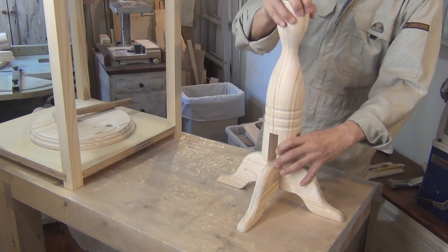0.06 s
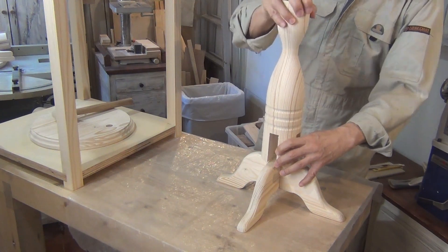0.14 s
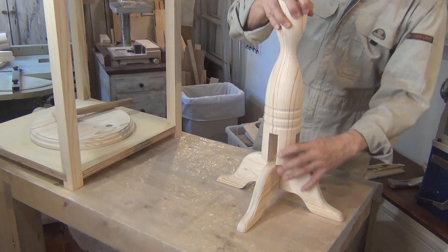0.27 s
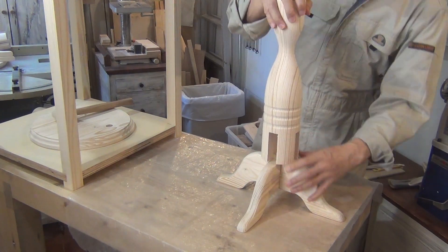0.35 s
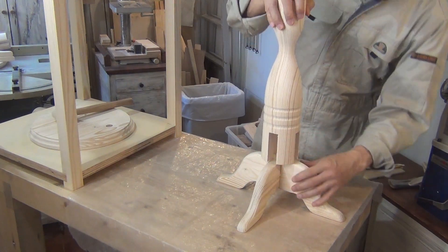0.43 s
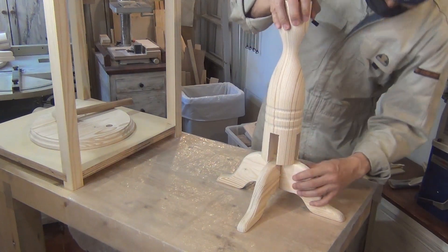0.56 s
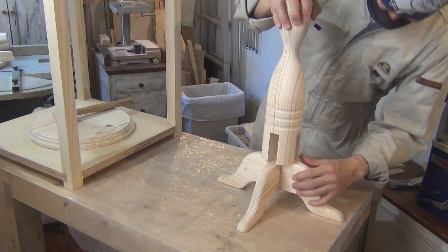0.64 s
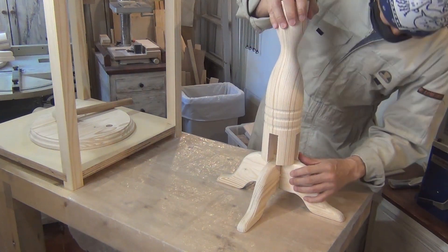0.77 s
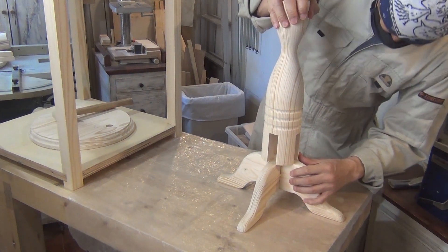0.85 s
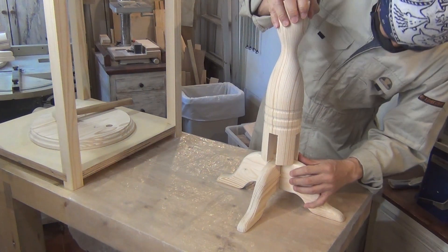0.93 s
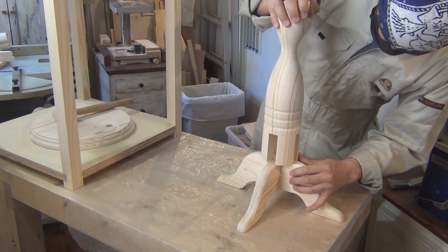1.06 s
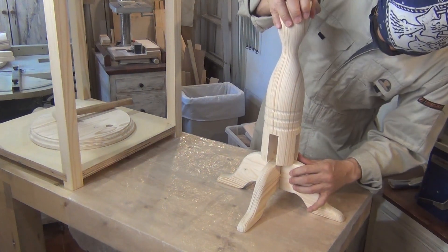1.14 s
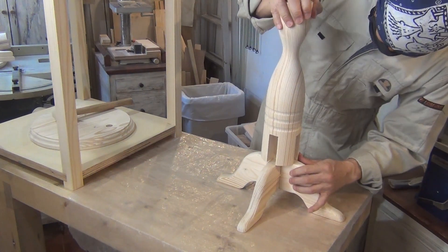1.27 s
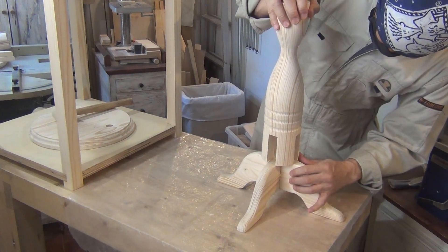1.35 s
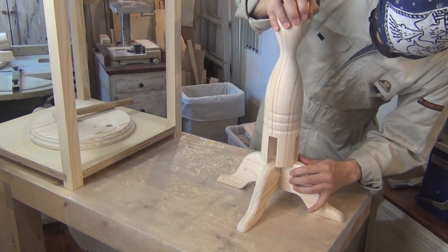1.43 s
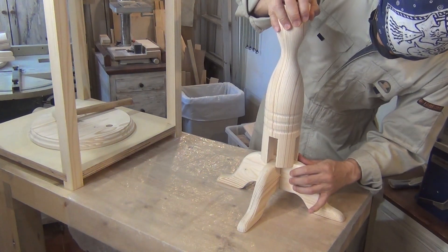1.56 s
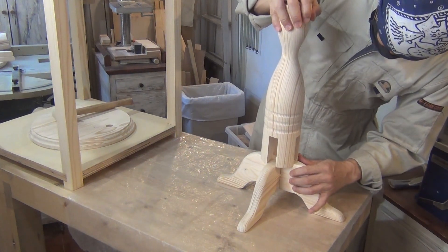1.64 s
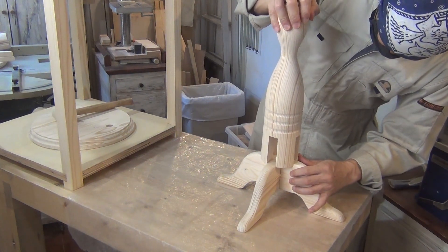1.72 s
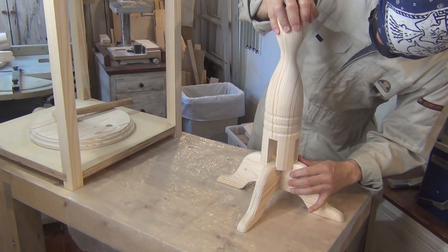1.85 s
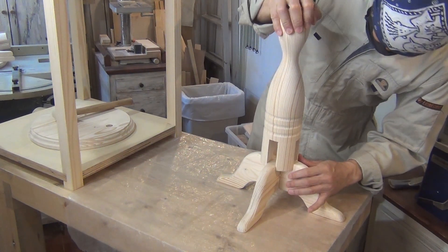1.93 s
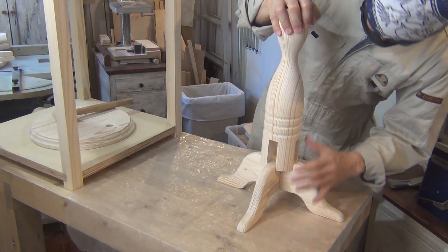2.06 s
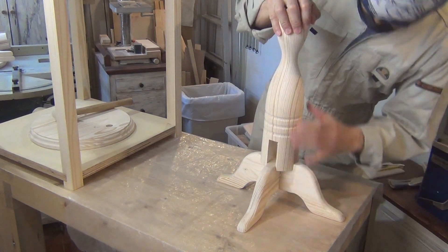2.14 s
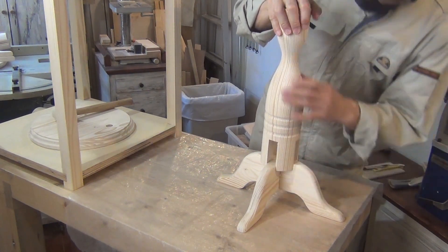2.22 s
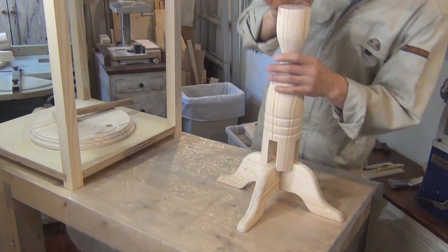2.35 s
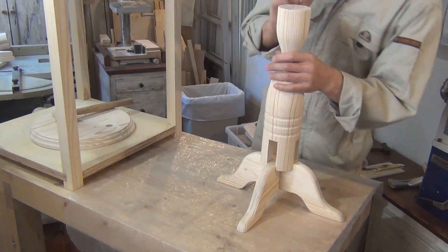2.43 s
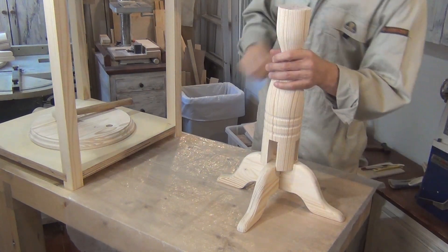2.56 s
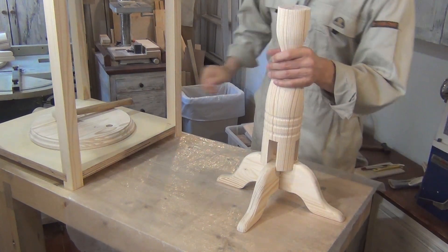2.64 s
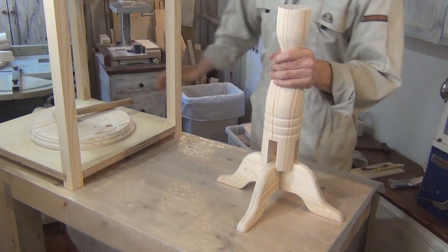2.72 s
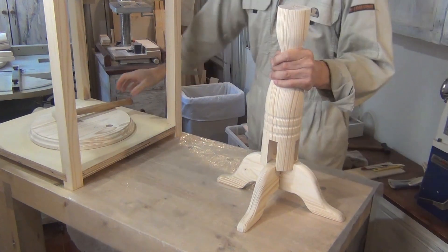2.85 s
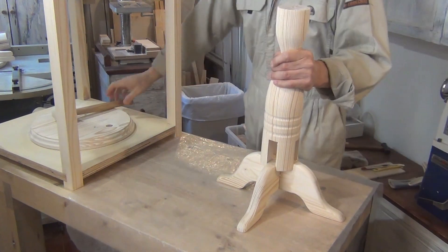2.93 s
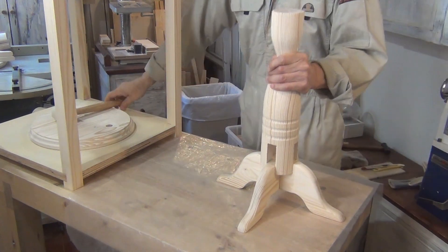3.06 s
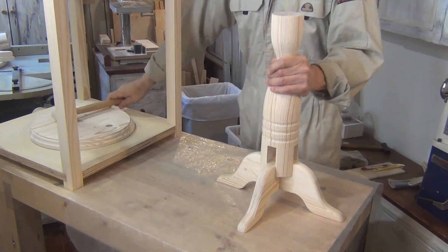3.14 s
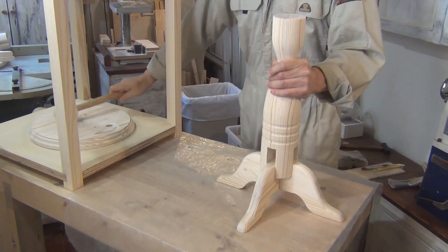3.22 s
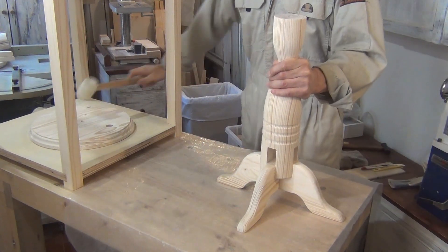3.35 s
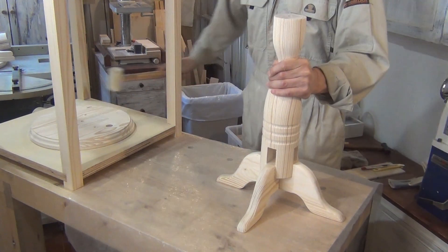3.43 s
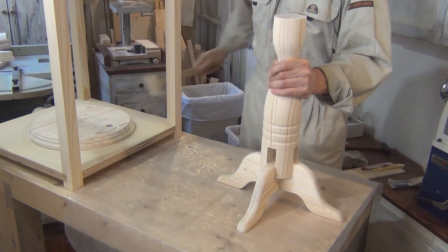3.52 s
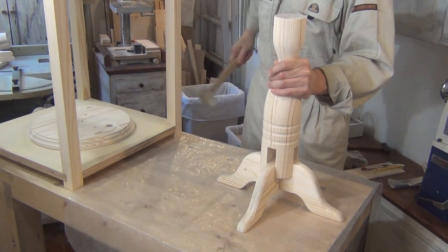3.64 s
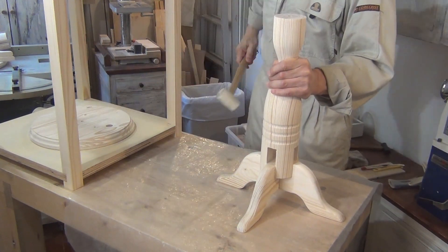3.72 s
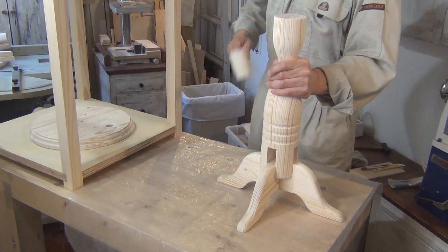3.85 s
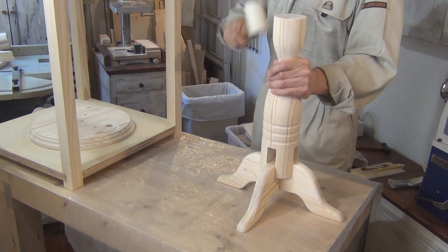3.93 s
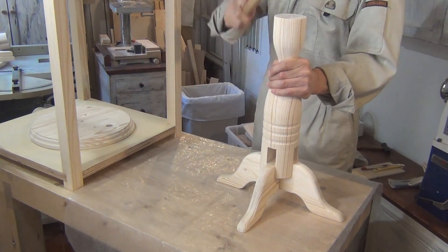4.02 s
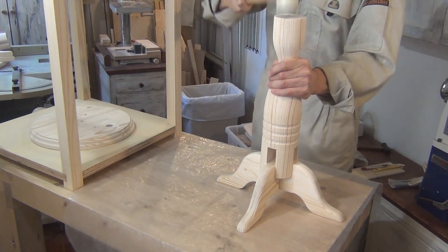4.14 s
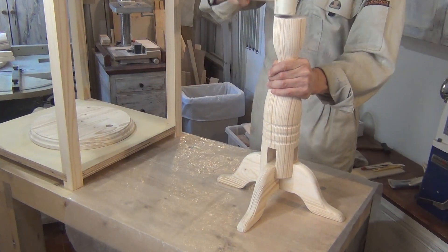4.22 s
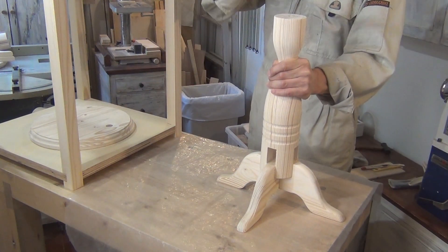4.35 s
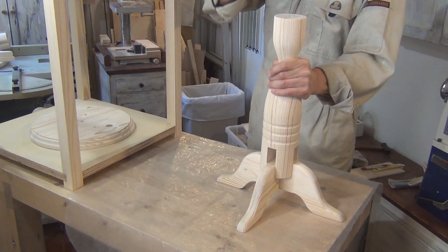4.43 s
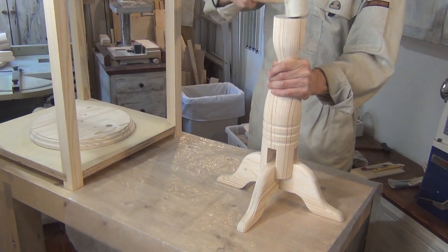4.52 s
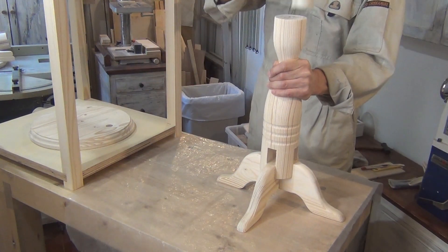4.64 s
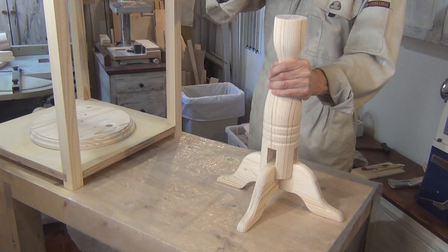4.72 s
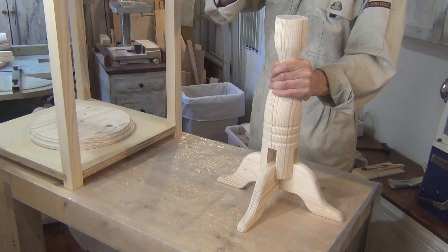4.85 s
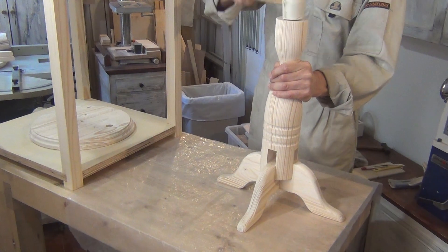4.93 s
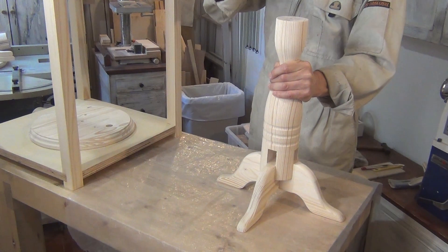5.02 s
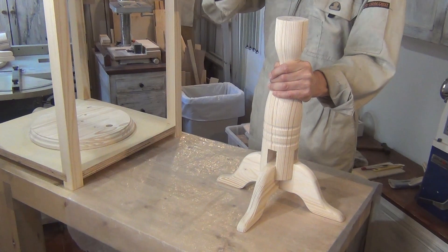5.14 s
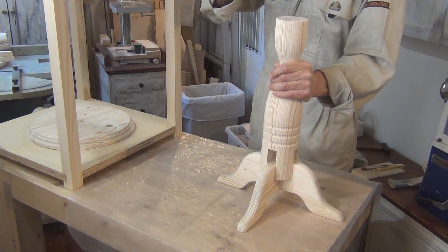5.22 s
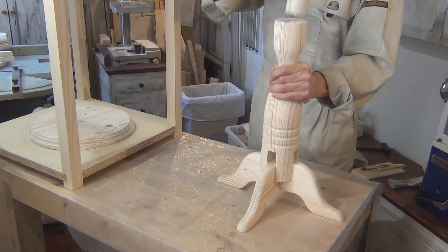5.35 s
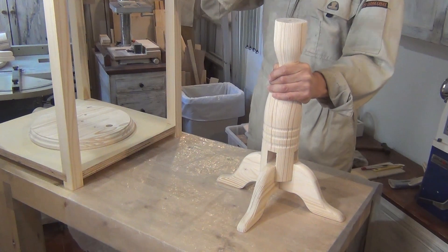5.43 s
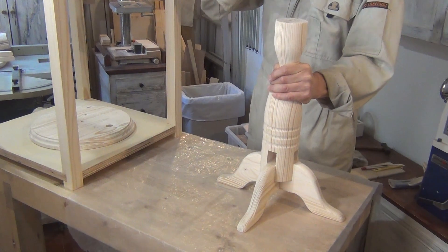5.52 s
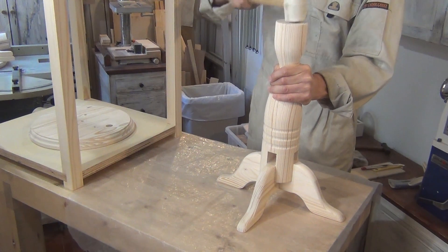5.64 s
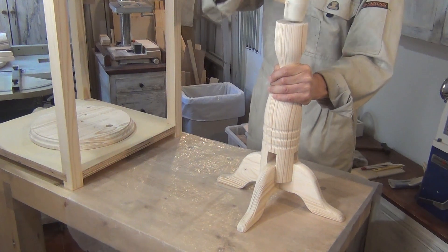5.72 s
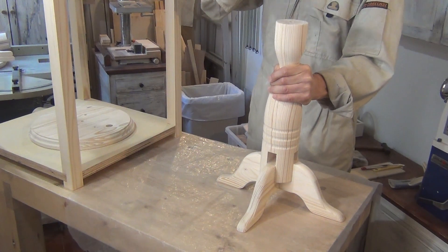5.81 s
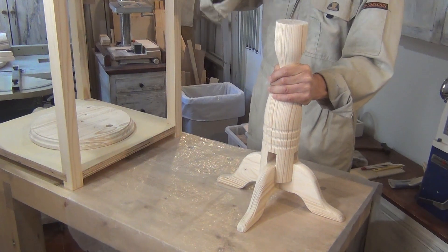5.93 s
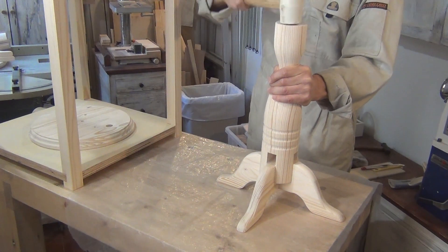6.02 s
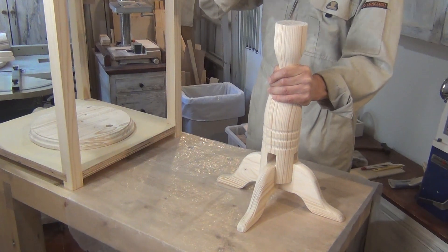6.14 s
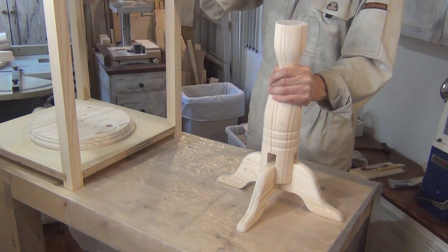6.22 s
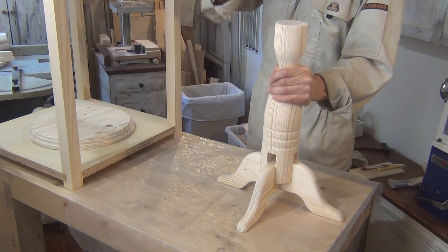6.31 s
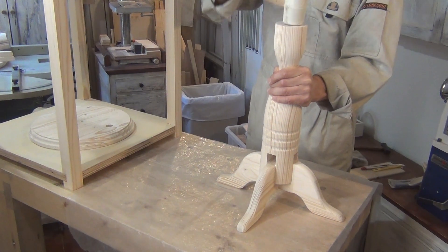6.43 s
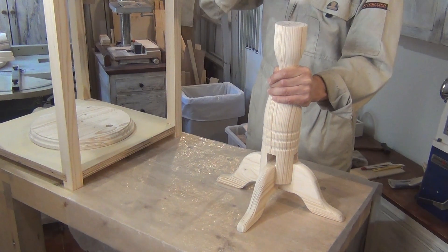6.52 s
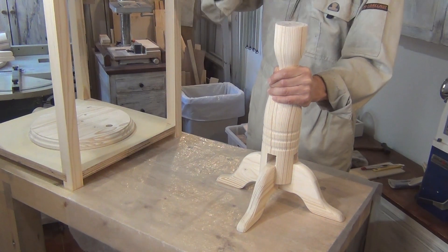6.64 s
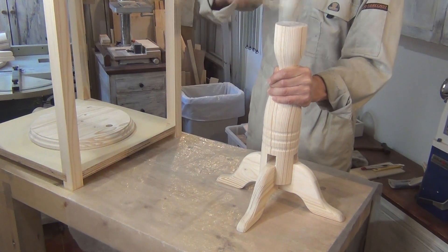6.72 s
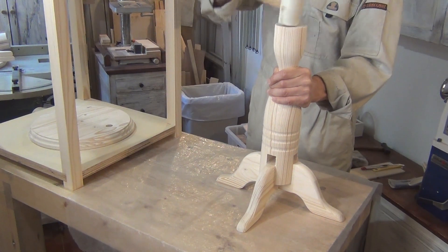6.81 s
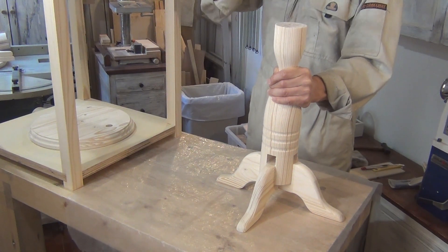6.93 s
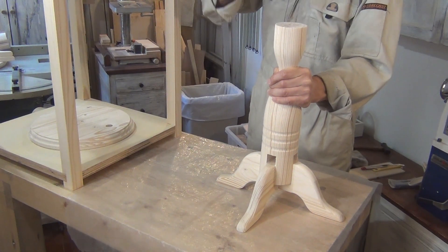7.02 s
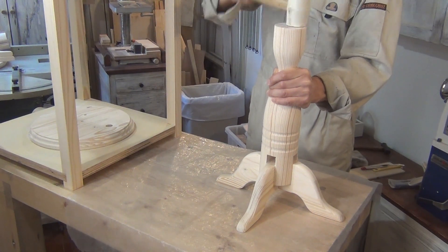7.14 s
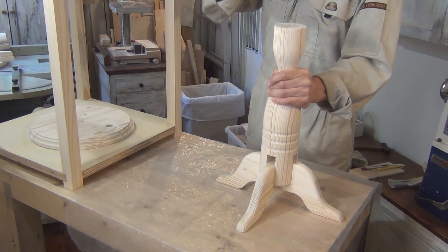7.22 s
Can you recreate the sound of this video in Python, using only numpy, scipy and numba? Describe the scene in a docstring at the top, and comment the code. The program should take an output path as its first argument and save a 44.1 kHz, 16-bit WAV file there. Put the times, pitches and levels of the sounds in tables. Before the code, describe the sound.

Hands rub softly over bare wood, a leg clunks and wood judders on a bench, then nine hard, evenly spaced mallet knocks ring through a small workshop.

```python
"""A small workshop. Room air, filtered noise with steady hums, lies under hands rubbing a wooden column: trains
of tiny slips. A leg clunks softly at 1.4 and 2.77 s, noise bursts with damped modes; near 2.4 and 3.3 s wood
drags in resonant judders. A low sine near 80 Hz rings on after the second clunk, then swells again. From 4.2 s
a mallet gives nine nearly regular blows: crack, diffuse room, bench modes and a rattling tray. After some, a
steel tool rings in beating sines and loose metal things ping. A fast and a slow level control act on the whole."""
import sys
import numpy as np
from scipy import signal
from scipy.fft import rfft, irfft, next_fast_len
from scipy.io import wavfile
from scipy.ndimage import uniform_filter1d, map_coordinates
from numba import njit

SR = 44100
rng = np.random.default_rng(int(sys.argv[2]) if len(sys.argv) > 2 else 0)


def linear_from_db(decibels):
    """Turn decibels (scalar or array-like) into linear amplitude factors; 0 gives 1."""
    return 10 ** (np.asarray(decibels, float) / 20)


def waveform_to_disk(signal):
    """Save audio, clipped to [-1, 1], as 16-bit WAV at the path in sys.argv[1]."""
    frames = np.transpose(np.atleast_2d(signal))
    scaled = np.clip(frames, -1, 1) * 32767
    samples = np.round(scaled).astype(np.int16)
    wavfile.write(sys.argv[1], SR, samples)


N = 320607


def unit(x):
    """Normalization of power: scale to rms 1."""
    return x / np.sqrt(np.mean(x ** 2) + 1e-20)


def along(points, hz):
    """Interpolation of (f/Hz, value) points on a logarithmic frequency axis."""
    f, v = np.transpose(points)
    return np.interp(np.log(hz + 1), np.log(f + 1), v)


def wobble(rate):
    """Band-limited random modulation: a smooth curve through `rate` random knots a second."""
    knots = rng.standard_normal(int(N * rate / SR) + 4)
    return map_coordinates(knots, [np.arange(N) * rate / SR])


def envelope(rows):
    """Incoherent addition: rows rise, hold and fall exponentially, and overlapping rows add in power."""
    start, rise, hold, db, fall = np.transpose(rows)[..., None]
    t = np.arange(N) / SR - start
    onset = np.clip(t / np.abs(rise), 0, 1) ** 1.36
    shape = onset * linear_from_db(db - fall * np.maximum(t - rise - hold, 0))
    return np.sqrt(np.sum(shape ** 2, axis=0))


def filtered(x, response):
    """Linear filtering: multiply the spectrum by a complex response of frequency."""
    m = 2 * next_fast_len(x.shape[-1] // 2 + 4096)
    spectrum = rfft(x, m) * response(np.fft.rfftfreq(m, 1 / SR))
    return irfft(spectrum, m)[..., :x.shape[-1]]


def resonant(x, peaks):
    """Modal superposition: causal second-order resonances summed with alternating sign."""
    def response(f):
        return sum((-1) ** k * linear_from_db(db) * 1j * f * width / (centre * centre - f * f + 1j * f * width)
                   for k, (centre, width, db) in enumerate(peaks))
    return filtered(x, response)


def causal(x, colour):
    """Minimum phase: a dB curve of frequency is folded in the cepstrum, so nothing sounds before a hit."""
    def response(hz):
        cepstrum = irfft(np.log(linear_from_db(colour(hz)) + 1e-6))
        half = len(cepstrum) // 2
        cepstrum = cepstrum * np.r_[1, np.full(half - 1, 2), 1, np.zeros(half - 1)]
        return np.exp(rfft(cepstrum))[:len(hz)]
    return filtered(x, response)


# stereo width of the field: f/Hz, filter gain from twin to side/dB
SIDE_GAIN = [(35, 1), (60, -6), (110, -12), (200, -15), (380, -16.5), (700, -18.5), (1290, -19.5),
             (2380, -23), (4400, -19), (8120, -8.5), (15000, -41)]


def stereo(mid, twin):
    """Interchannel decorrelation: a second signal, weakened by frequency, becomes the side signal."""
    side = causal(twin, lambda hz: along(SIDE_GAIN, hz))
    return np.array([mid + side, mid - side])


# reverberation of the room: f/Hz, t60/s
ROOM_T60 = [(80, 0.38), (250, 0.26), (1000, 0.3), (4000, 0.28), (8000, 0.27), (14000, 0.16)]


def tail(colour):
    """Diffuse reverberation: two noises in which each frequency decays at its own speed."""
    hz, t, z = signal.stft(rng.standard_normal((2, SR)), SR, nperseg=256)
    level_db = colour(hz)[:, None] - 60 * t / along(ROOM_T60, hz)[:, None]
    return signal.istft(z * linear_from_db(level_db), SR, nperseg=256)[1][:, :SR]


def ring(modes, scatter_db, attack):
    """Modal decay: damped sines of (f/Hz, level/dB, t60/s), randomly scattered in level at each call."""
    t = np.arange(SR) / SR
    hz, db, t60 = np.transpose(modes)[..., None]
    size = linear_from_db(db + scatter_db * rng.standard_normal(hz.shape) - 60 * t / t60)
    return np.sum(size * np.sin(2 * np.pi * hz * t), axis=0) * (1 - np.exp(-t / attack))


def grit(density, spread_db):
    """Stick-slip friction as shot noise: two random trains of `density` uneven slips a second."""
    slips = (rng.random((2, N)) < density / SR) * rng.standard_normal((2, N))
    return unit(slips * linear_from_db(spread_db * wobble(60)))


# spectrum of room air and hiss: f/Hz, relative level per Hz/dB
AIR_SPECTRUM = [(13, -62), (22, -32.5), (44, 3), (103, -5.5), (156, -1.5), (212, -7.5), (321, -2),
                (447, -4.5), (513, -5), (820, -6.5), (916, -5.5), (2160, -17.5), (2690, -19),
                (13700, -27.5), (16200, -27.5)]
# faint steady tones: f/Hz, level/dB, waver/dB
HUM_TONES = [(35, -54, 2.5), (1560, -71, 2.5), (15734, -66, 1.5)]
# low tone near 80 Hz, first ringing on after the clunk at 2.77 s, then swelling again:
# start t/s, rise t/s, hold t/s, level/dB, fall/(dB per s)
LOW_TONE_ROWS = [(2.75, 0.024, .01, -50, 55), (3.1, 0.74, .2, -54, 17), (4.2, 0.22, .02, -49, 70)]
AIR_DB = -53.5
LOW_TONE_HZ, LOW_TONE_SAG_HZ_PER_S = 81, 3.4  # pitch at the start of the first row; steady sinking


def background():
    """Stationary noise and tones: room air with slow patches, wavering hums and a sinking low tone."""
    z = signal.stft(rng.standard_normal((2, N)), nperseg=512)[2]
    patches = uniform_filter1d(rng.standard_normal(z.shape[1:]), size=6, axis=0)  # over frequency
    patches = unit(uniform_filter1d(patches, size=12, axis=1))  # over time
    noise = signal.istft(z * linear_from_db(1.2 * patches), nperseg=512)[1][:, :N]
    air = linear_from_db(AIR_DB) * unit(filtered(noise, lambda hz: linear_from_db(along(AIR_SPECTRUM, hz))))
    t = np.arange(N) / SR
    hums = sum(linear_from_db(db + waver_db * wobble(9)) * np.sin(2 * np.pi * hz * t) for hz, db, waver_db in HUM_TONES)
    low_hz = LOW_TONE_HZ - LOW_TONE_SAG_HZ_PER_S * (t - LOW_TONE_ROWS[0][0])
    low_tone = np.sin(2 * np.pi * np.cumsum(low_hz) / SR)
    low_tone = envelope(LOW_TONE_ROWS) * linear_from_db(1.1 * wobble(4.1)) * low_tone
    return stereo(*air) + hums + low_tone


# strokes of skin and cloth on wood: start t/s, rise t/s, hold t/s, level/dB, fall/(dB per s)
HAND_STROKES = [(-0.03, 0.035, .015, -58.5, 130), (0.26, 0.039, 0.19, -56.5, 75),
                (0.575, 0.031, .01, -56.5, 36), (0.76, 0.026, .005, -58, 150), (0.8, .03, .05, -63, 46),
                (1.18, .04, .01, -71, 220), (1.3, 0.057, .01, -69, 300), (1.48, 0.036, .005, -52.5, 330),
                (1.67, 0.059, .01, -64.5, 85), (1.8, 0.088, 0.044, -50.5, 260), (2.13, 0.12, 0.09, -62, 60),
                (2.35, 0.024, .005, -54.5, 140), (2.4, 0.073, 0.14, -58.5, 23),
                (2.83, 0.046, .01, -62, 110), (3.075, 0.045, 0.018, -40, 250),
                (3.17, 0.053, .025, -49, 230), (3.29, .05, .02, -57, 35), (3.51, .03, .01, -56.5, 48),
                (3.8, 0.15, .03, -64, 20)]
# spectrum of the rubbing hiss: f/Hz, relative level per Hz/dB
SKIN_SPECTRUM = [(2350, -36), (4000, -11), (4680, -2.5), (7270, 7), (8160, 7), (11400, -13.5), (16000, -38)]
# grit snapping under the hands: t/s, burst level before the resonances/dB
GRIT_SNAPS = [(0.7866, -28), (0.9183, -36), (1.443, -33), (1.9579, -25), (1.961, -24), (3.034, -36),
              (3.0775, -31)]
RESTING_DB, CLOTH_DB = -67.5, -2.5  # hands never quite rest; lower band relative to the hiss
HANDS_STILL_S = 4.2  # the grip tightens and the rubbing stops


def hands():
    """Sliding friction: slips of skin and cloth excite two coloured bands; now and then a grain snaps."""
    moving = np.arange(N) / SR < HANDS_STILL_S
    level = moving * np.hypot(envelope(HAND_STROKES), linear_from_db(RESTING_DB)) * linear_from_db(0.99 * wobble(25.03))
    slips = grit(density=9000, spread_db=0.0)
    hiss = unit(filtered(slips, lambda hz: linear_from_db(along(SKIN_SPECTRUM, hz))))
    cloth = unit(resonant(grit(density=8100, spread_db=0.5), [(2720, 8100, -2.5), (4240, 2700, 3.0)]))
    snaps = np.zeros((2, N))
    for s, db in GRIT_SNAPS:
        snaps[:, round(s * SR):][:, :160] += linear_from_db(db - np.arange(160) / 6) * rng.standard_normal((2, 160))
    snaps = resonant(snaps, [(3980, 540, -19), (7600, 1000, -2.5)])
    return stereo(*(level * (hiss + linear_from_db(CLOTH_DB) * cloth) + snaps))


def softness(hz, boom_db, treble_db):
    """Contact stiffness: a softer contact gives more boom and less treble, as a dB tilt over frequency."""
    return along([(70, 0.81 * boom_db), (160, 1.32 * boom_db), (270, 1.14 * boom_db), (420, 0.41 * boom_db),
                  (900, 0.061 * boom_db), (4000, treble_db), (13000, 1.82 * treble_db)], hz)


def knock_room(colour):
    """Diffuse field: the knock builds up in the room and decays, thinned where single modes stand out."""
    t = np.arange(SR) / SR
    sparse = [(45, -30), (70, -8), (700, -6), (1800, 0)]
    return tail(lambda hz: colour(hz) + along(sparse, hz)) * (1 - np.exp(-t / 0.0076))


def crack(colour, contact_db):
    """Direct impact: a very short, bright noise burst at first contact."""
    t = np.arange(SR) / SR
    brightness = [(300, -13), (2000, 11), (3500, 2.5), (7500, 12.5), (11000, 8.0), (15000, -8)]
    burst = rng.standard_normal((2, SR)) * linear_from_db(contact_db - 60 * t / 0.023) * (1 - np.exp(-t / 0.00052))
    return causal(burst, lambda hz: colour(hz) + along(brightness, hz))


# modes of bench, column and low room: f/Hz, relative level/dB
BENCH_MODES = [(73, -46), (108, -47.5), (135, -46), (167, -40), (255, -36.5), (285, -38.5), (311, -36.5),
               (349, -35.5), (404, -32.5), (462, -42.5), (527, -36), (596, -40), (636, -48.5), (690, -37.5),
               (765, -36), (830, -38), (895, -54), (938, -46.5), (1026, -40), (1051, -40), (1116, -62),
               (1377, -43)]
# modes of the column itself, damped by the hand: f/Hz, relative level/dB, t60/s
COLUMN_MODES = [(124, -44.5, 0.056), (282.1, -40, 0.24), (447, -46, 0.14), (652, -31, 0.14),
                (703, -35.5, 0.19), (785.5, -31.5, 0.14), (995, -39.5, 0.067), (2150, -49, .02)]


def wood_modes(tilt):
    """Modal decay of wood: bench modes die almost with the room, column modes at their own rate."""
    bench = [(hz, db + tilt(hz), 0.93 * along(ROOM_T60, hz)) for hz, db in BENCH_MODES]
    column = [(hz, db + tilt(hz), t60) for hz, db, t60 in COLUMN_MODES]
    return ring(bench, scatter_db=2.2, attack=.007) + ring(column, scatter_db=1.5, attack=.002)


# resonances of a thin sheet on the bench: f/Hz, width f/Hz, relative level/dB
TRAY_PEAKS = [(3340, 150, -5), (4676, 25, 0), (4960, 200, -6), (5109, 50, 0)]
TRAY_DB, TRAY_PER_TREBLE, TRAY_PER_BOOM = -9.5, 3, -1.2  # level, dB per dB of treble, dB per dB of boom


def tray(boom_db, treble_db):
    """Plate resonance: decaying noise in narrow bands, stronger under a hard, bright blow."""
    t = np.arange(SR) / SR
    db = TRAY_DB + TRAY_PER_TREBLE * treble_db + TRAY_PER_BOOM * boom_db
    return linear_from_db(db - 60 * t / 0.32) * resonant(rng.standard_normal(SR), TRAY_PEAKS)


# soft clunks of the legs on the bench: t/s, strength/dB, boom/dB, treble/dB, first contact/dB
LEG_CLUNKS = [(1.4483, -21.5, 12, -13.5, 4.5), (2.769, -49.5, 19, -12, 11)]
# mallet blows: t/s, strength/dB, boom/dB, treble/dB, first contact/dB
MALLET_BLOWS = [(4.22, -1.5, 8.5, -2.5, 8), (4.583, 8, -1.5, -1, -1), (4.948, 6, 1, -3, -3.5),
                (5.317, 9.5, -3, -1.5, -0.5), (5.702, 8.5, -2, 0.5, -10), (6.064, 7.5, -1, 1.5, -3),
                (6.432, 7, -0.5, 2.5, -1.5), (6.805, 6.5, 0.5, 3.5, -9), (7.148, 7, 0, -1.5, -2.5)]
# wood on wood, heard in the room: f/Hz, relative level per Hz/dB
KNOCK_SPECTRUM = [(35, -16), (60, -12), (207, -9.5), (398, 2.5), (651, -1), (2410, -18.5), (3340, -20),
                  (4120, -22), (4970, -25), (5590, -26.5), (7750, -23.5), (11000, -43.5), (14600, -43),
                  (16000, -72)]


def knocks():
    """Impact excitation: each clunk or blow cracks, fills the room, booms in the bench, rattles the tray."""
    out = np.zeros((2, N + SR))
    for s, db, boom_db, treble_db, contact_db in LEG_CLUNKS + MALLET_BLOWS:
        tilt = lambda hz: softness(hz, boom_db, treble_db)
        colour = lambda hz: along(KNOCK_SPECTRUM, hz) + tilt(hz)
        hit = linear_from_db(12.0) * (knock_room(colour) + crack(colour, contact_db))
        # the modes reach the side feed at half size, inverted
        hit = hit + linear_from_db(19) * np.outer([1, -.5], wood_modes(tilt)) + tray(boom_db, treble_db)
        out[:, round(s * SR):][:, :SR] += linear_from_db(db) * hit
    return stereo(*out[:, :N])


# wood dragged over the bench: start t/s, rise t/s, hold t/s, level/dB, fall/(dB per s)
DRAG_STROKES = [(2.405, .004, 0.095, -43, 77), (2.62, .05, .07, -59, 200), (3.257, 0.038, 0.035, -39, 93),
                (3.5, 0.099, 0.085, -58.5, 103)]
# moments when a leg catches: t/s, level/dB
LEG_CATCHES = [(2.41, -44.5), (2.44, -45), (2.475, -46.5), (2.548, -43), (2.575, -47), (3.258, -38.5),
               (3.304, -35), (3.335, -40), (3.37, -45), (3.41, -50.5)]
# resonances of the rasp: f/Hz, width f/Hz, relative level/dB
RASP_PEAKS = [(1387, 42, 2.5), (1614, 89, 0), (1900, 170, -1), (2165, 120, 1), (2415, 82, 0), (2666, 82, 2),
              (2870, 135, -1), (4660, 630, -11.5)]
# resonances of the bench body: f/Hz, width f/Hz, relative level/dB
BODY_PEAKS = [(141, 41, -5.5), (322, 105, -0.5), (435, 42, 3), (672, 62, -3.5), (813, 38, -7.5),
              (960, 86, -7)]
CATCH_RISE_S, CATCH_HOLD_S, CATCH_FALL = 0.0054, 0.013, 420  # s, s, dB per s


def drags():
    """Stick-slip friction: wood slips drive a rasp band and the bench body, blurred by the room."""
    rasp = resonant(grit(density=1500, spread_db=0.5), RASP_PEAKS)
    rasp = unit(resonant(rasp, [(2100, 2400, 0)]))
    body = unit(resonant(grit(density=900, spread_db=-2.0), BODY_PEAKS))
    catches = envelope([(s, CATCH_RISE_S, CATCH_HOLD_S, db, CATCH_FALL) for s, db in LEG_CATCHES])
    slide = envelope(DRAG_STROKES)
    near = slide * rasp + np.hypot(catches, linear_from_db(-7.5) * slide) * body
    echo = tail(np.zeros_like)
    wet = signal.fftconvolve(near, echo / np.linalg.norm(echo[0]), axes=1)[:, :N]
    return stereo(*(linear_from_db(-2.5) * near + linear_from_db(-4.5) * wet))


# loose metal sounds after a blow: t/s, long steel ring level/dB, short ping level/dB,
# higher ping relative to the 6368 Hz ping/dB
METAL_HITS = [(4.265, -43.5, -30, -35), (5.02, -55, -34, -20), (5.76, -48.5, -49, -15),
              (6.499, -55, -60, -10), (6.871, -53, -49, -10), (7.196, -83, -33, -4)]
# long modes of a steel tool, the close pair beats: f/Hz, relative level/dB, t60/s
STEEL_MODES = [(3074, -13, 1.3), (6632, 0, 1), (6648, -3.5, .9)]
# short pings of loose metal things, 6368 Hz and a higher one, of another object, clear at 7.2 s: f/Hz, t60/s
PING_TONES = [(6368, .2), (9700, .25)]


def loose_metal():
    """Modal ringing and beats: a landing steel tool rings long, and loose metal things ping briefly."""
    out = np.zeros(N + SR)
    for s, ring_db, ping_db, higher_db in METAL_HITS:
        long = linear_from_db(ring_db) * ring(STEEL_MODES, scatter_db=1, attack=.02)
        pings = [(hz, db, t60) for (hz, t60), db in zip(PING_TONES, (0, higher_db))]
        short = linear_from_db(ping_db) * ring(pings, scatter_db=1, attack=.008)
        out[round(s * SR):][:SR] += long + short
    return stereo(out[:N], out[:N])


def scene():
    """Linear superposition of all sources."""
    return background() + hands() + knocks() + drags() + loose_metal()


@njit
def follow(over_db, attack, release):
    """First-order relaxation: a cut in dB rises with one time constant and falls with another."""
    cut, now = np.empty_like(over_db), 0.
    for i in range(len(over_db)):
        now += (over_db[i] - now) * (attack if over_db[i] > now else release)
        cut[i] = now
    return cut


def band_limit(x):
    """A steep low-pass at the top of the band."""
    return signal.sosfilt(signal.butter(12, 16640, fs=SR, output="sos"), x)


def record(dry):
    """Dynamic compression: a fast limiter flattens blows, a slow control sinks the background under them."""
    peak_db = 20 * np.log10(np.abs(dry).max(axis=0) + 1e-9)
    over_db = np.maximum(peak_db + 6.99, 0)
    fast_db = follow(over_db, 1 / (SR * 0.000093), 1 / (SR * 0.009))  # time constants in s
    slow_db = follow(fast_db, 1 / (SR * .9), 1 / (SR * 4.5))
    x = dry * linear_from_db(-fast_db - 0.47 * slow_db)
    x = x / (1 + np.abs(x / .66) ** 6) ** (1 / 6)  # soft saturation
    x = signal.sosfilt(signal.butter(3, 48, "high", fs=SR, output="sos"), x)  # low cut
    x = filtered(x, lambda hz: 1 / (1 + (hz / 16000) ** 80))  # steep treble edge
    return band_limit(x)


dry = scene()
out = record(dry)
waveform_to_disk(out)
```